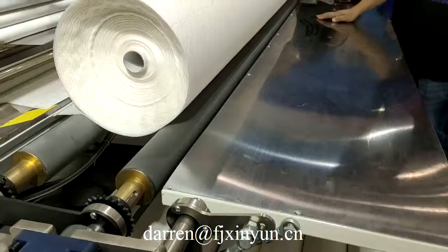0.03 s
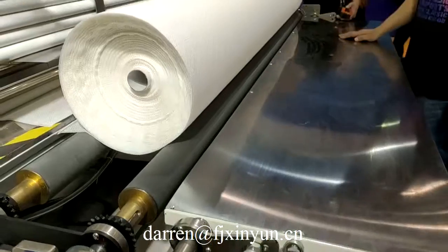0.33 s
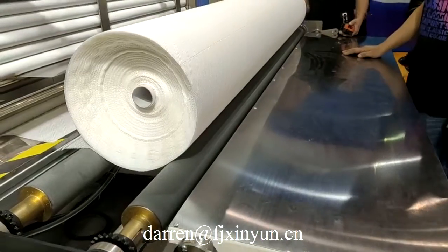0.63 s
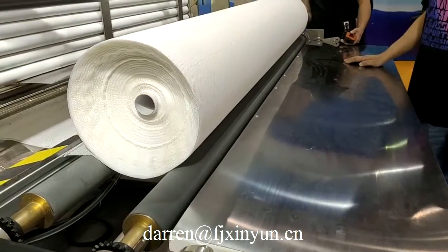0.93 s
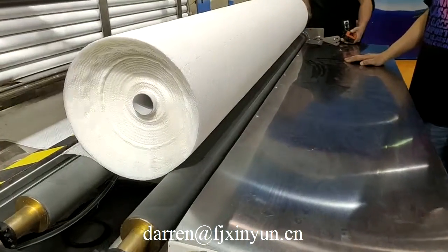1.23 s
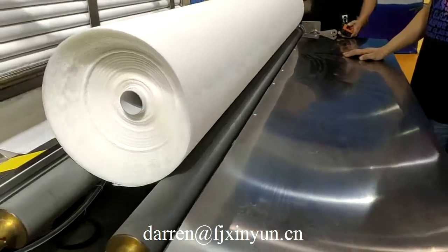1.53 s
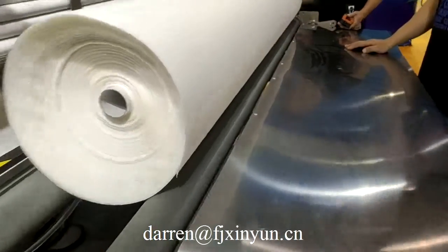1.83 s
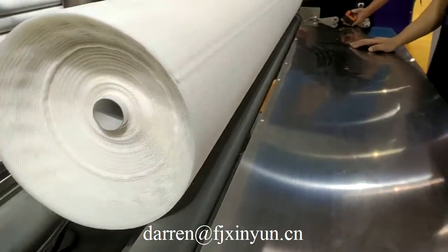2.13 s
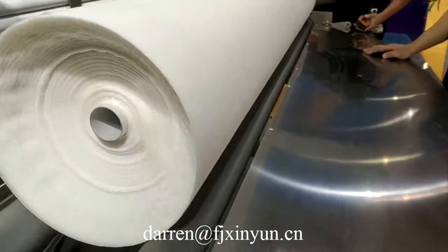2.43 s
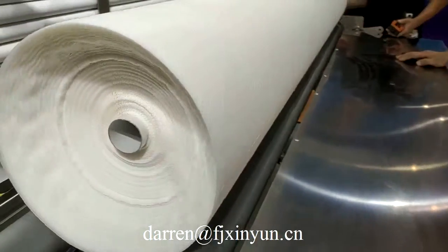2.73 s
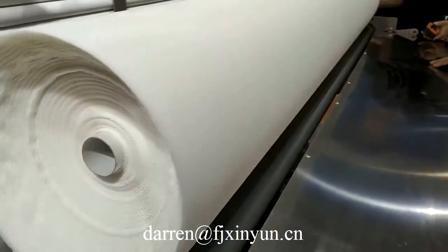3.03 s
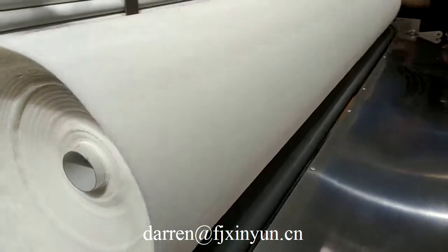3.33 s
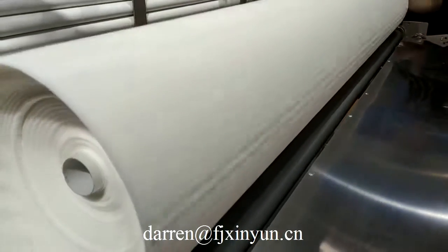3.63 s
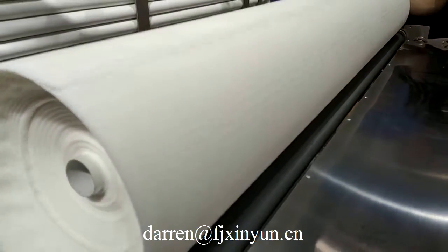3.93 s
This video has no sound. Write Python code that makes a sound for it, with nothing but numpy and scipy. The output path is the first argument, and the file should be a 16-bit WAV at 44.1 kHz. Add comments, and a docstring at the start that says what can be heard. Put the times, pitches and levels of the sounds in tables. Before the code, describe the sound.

A paper rewinding machine fades in at about 0.2 seconds and runs throughout with a pulsing rumble, roller roar, wavering hum and paper hiss on the left. Soft close swishes come between 0.8 and 1.5 seconds. At 2 seconds a loud handling rasp and two small clacks sound, then a sliding hiss peaks with more swishes around 2.6. The left side gradually dulls, turning sharply muffled at 3.4 seconds.

```python
"""A factory hall, where a paper rewinder spins a big roll: a rumble that repeats on every turn,
the roar of rollers, a wavering drive hum and the hiss of the paper web. A thin hiss sits to the right.
Close by come soft swishes, a sliding hiss, one loud rasp and two small clacks, like fingers shifting
on the recorder's case. The sound fades in and a limiter ducks after the rasp. The left treble dulls
gradually, then drops sharply near the end as the microphone is covered."""
import sys
import numpy as np
from scipy import signal
from scipy.io import wavfile
from scipy.ndimage import uniform_filter1d

SR = 44100
rng = np.random.default_rng(int(sys.argv[2]) if len(sys.argv) > 2 else 0)


def generate_wav(sig):
    """Save sig (samples, or channels by samples) to the path in sys.argv[1] as 16-bit PCM at SR."""
    pcm = np.round(np.clip(np.atleast_2d(sig).T, -1, 1) * 32767).astype(np.int16)
    wavfile.write(sys.argv[1], SR, pcm)


N = 176400
T = np.arange(N) / SR

# Stereo image of the hall. Each row: frequency in Hz, left-right correlation.
CORRELATION = [(50, 0.85), (140, 0.97), (300, 0.96), (480, 0.71), (700, 0.56), (900, 0.33), (1130, 0.11),
               (1500, -0.29), (2150, -0.027), (2800, 0.15), (3600, -.08), (6000, 0.38)]
# Fader rides for the top hiss, sliding hiss, paper web and roar. Each row: time in seconds, level in dB.
AIR_LEVEL = [(0.2, -56), (0.45, -49), (1.1, -57.5), (2.5, -46.5), (2.7, -76), (2.95, -90)]
SLIDE_LEVEL = [(0.5, -50), (1.0, -61), (1.6, -47), (1.9, -39.5), (2.1, -38.5), (2.25, -34), (2.38, -36.5),
               (2.53, -30), (2.59, -44), (2.75, -71)]
WEB_LEVEL = [(0.3, -47), (0.7, -38), (0.85, -38), (1.1, -37.5), (1.4, -35), (1.8, -36), (2.3, -36.5),
             (2.55, -36), (2.8, -37.5), (3.25, -40), (3.5, -46), (4, -42)]
ROAR_LEVEL = [(0.4, -27), (1.4, -27), (2.2, -28), (2.8, -27.5), (3.37, -26.5), (3.46, -27), (3.54, -26),
              (3.75, -26)]
# Tone of those four and of rubbing on the case. Each row: frequency in Hz, relative density in dB.
AIR_TONE = [(9500, -2), (12000, -43), (15000, 26)]
SLIDE_TONE = [(1500, 1.5), (2800, 6), (4000, 6.5), (5700, 7.5), (7300, 5.5), (9000, -1.5), (11500, -32),
              (15000, -34)]
WEB_TONE = [(900, 8.5), (2000, -2), (2700, -3), (3400, 4.5), (4200, 6.5), (5300, 8), (6500, -13),
            (8000, -76), (10500, -102), (15000, -51)]
ROAR_TONE = [(28, -29), (55, -19), (100, -14.5), (140, -7), (190, -2), (340, -1), (520, -4), (800, -5),
             (1300, -10), (2100, -17), (3700, -19.5), (4700, -25.5), (6000, -19), (7500, -35), (9500, -94),
             (12000, -108)]
RUB_TONE = [(300, -16), (680, 0.5), (1000, 0.5), (1400, 0), (2200, -3.5), (3300, -3), (4400, 2), (5700, -2),
            (7000, -6.5), (9000, -19), (12000, -32), (15000, -27)]
# Swish cues. Each row: peak time in seconds, level in dB, attack and decay in seconds,
# low and high band edge in Hz, pan to the left in dB.
SWISHES = [(0.808, -27.5, 0.031, 0.042, 3200, 6460, 5.5), (0.882, -34.5, 0.0052, 0.0085, 3520, 6500, 5),
           (0.963, -29.5, 0.013, 0.029, 3570, 6860, 3), (1.240, -29, 0.015, 0.023, 4360, 6550, 0.5),
           (1.308, -29, 0.0098, 0.056, 2900, 6950, 4), (1.547, -31.5, .008, 0.018, 3300, 7600, 5),
           (2.552, -21, 0.013, 0.016, 2870, 8300, 7), (2.633, -25.5, 0.0033, 0.0073, 6400, 7300, 12),
           (2.640, -26.5, 0.011, 0.03, 3280, 7650, 8), (2.805, -36, 0.01, 0.019, 4200, 6400, -13)]
# Rasp and clack cues. Each row: peak time in seconds, level in dB, attack and decay in seconds,
# rubbing against ring in dB, snap against one slip in dB, pan to the left in dB.
CLACKS = [(1.985, -14.5, 0.013, 0.011, 5, -6, 2.8), (2.001, -22.5, 0.0044, 0.0054, 1.5, -3, 0),
          (2.074, -24.5, 0.013, 0.012, -2, 9, 4.5), (2.105, -31, 0.0026, 0.0036, 0, 0, 0),
          (2.1174, -17.5, .002, 0.0065, -7, 8.5, 12)]
# The ring of the case. Each row: frequency in Hz, gain in dB, time to fall 60 dB in seconds.
CASE_MODES = [(2350, 0, 0.018), (2610, 1.5, 0.018), (2870, -4, 0.018), (3030, 14, 0.014),
              (3447, 5.5, 0.022), (4430, -9, .012), (4800, -16, .012), (5900, -15, .01), (7200, -7, 0.0094)]
# EQ for the knock of the case, the hollow of the hand and the left microphone.
# Each row: centre in Hz, width in Hz, gain in dB.
KNOCK_EQ = [(940, 220, 8)]
HAND_EQ = [(2740, 500, 3), (6950, 1600, 9.5)]
LEFT_MIC_EQ = [(1430, 770, 1), (2670, 620, 5), (6300, 1500, -5.5)]
# Tones of the drive. Each row: frequency in Hz, level in dB.
HUM_TONES = [(132, -51.5), (158, -48.5), (368.5, -42.5), (415, -49), (442, -49), (1846, -50.5)]
# Harmonics of the rumble. Each row: multiple of the turning rate, level in dB.
RUMBLE_HARMONICS = [(7, -67), (8, -67), (9, -58), (10, -48.5), (11, -45.5), (12, -43), (13, -46.5),
                    (14, -44), (15, -41), (16, -49), (17, -47), (18, -59), (19, -58.5), (20, -40),
                    (21, -69), (24, -50.5), (25, -44.5), (26, -42), (27, -61), (28, -43), (30, -52.5),
                    (31, -67), (32, -50), (33, -59), (34, -47.5), (36, -52), (39, -53), (41, -76),
                    (46, -67), (47, -46), (51, -61), (53, -65), (56, -51), (57, -54), (58, -76),
                    (59, -46.5), (60, -61), (61, -80), (65, -67), (66, -57), (67, -51.5)]
# Fader ride for the rumble, with a few surges. Each row: time in seconds, gain in dB.
RUMBLE_RIDE = [(0.4, -.5), (1.2, 0.4), (1.32, -1), (1.45, 0.5), (2.2, -0.22), (3.22, 0.3), (3.36, 1.5),
               (3.47, -1.44), (3.53, 4.5), (3.75, -1)]
# The left channel's treble dulls gradually, then drops sharply at 3.42 s as the microphone is covered.
# Each row: time in seconds, cut-off in Hz.
LEFT_CUTOFF = [(2.6, 12700), (2.9, 8400), (3.2, 7500), (3.40, 5350), (3.46, 3300), (3.62, 3850), (4, 2970)]
# The opening fade. Each row: seconds after the sound starts, gain in dB.
FADE_IN = [(0, -18), (.05, -8), (.12, -3), (.182, -1.5), (.198, 0.5), (.4, 0)]


def from_db(db):
    """Decibels to gain."""
    return 10 ** (np.asarray(db) / 20)


def rms_one(x):
    """Scale to rms 1."""
    return x / np.sqrt(np.mean(x ** 2) + 1e-20)


def in_time(rows, start=0):
    """An automation curve, read at every sample."""
    return np.interp(T - start, *np.transpose(rows))


def at_hz(points, hz):
    """Read a curve on a log-frequency axis."""
    freqs, values = np.transpose(points)
    return np.interp(np.log(hz), np.log(freqs), values)


def butter(x, hz, kind, order=2):
    """Butterworth filter."""
    sos = signal.butter(order, np.clip(hz, 10, .45 * SR), kind, fs=SR, output="sos")
    return signal.sosfilt(sos, x)


def bell_eq(x, bells):
    """A chain of bell boosts and cuts."""
    for hz, width, db in bells:
        w, g = 2 * np.pi * hz / SR, from_db(db / 2)
        a = np.sin(w) * width / (2 * hz)
        x = signal.lfilter([1 + a * g, -2 * np.cos(w), 1 - a * g],
                           [1 + a / g, -2 * np.cos(w), 1 - a / g], x)
    return x


def pan(left_db):
    """Constant-power gains, with the left louder by left_db."""
    return rms_one(from_db([[left_db / 2], [-left_db / 2]]))


def drift(hz):
    """Smooth random modulation with a spread of about 1."""
    step, settle = 40, 2000
    pole = np.exp(-2 * np.pi * hz * step / SR)
    white = rng.standard_normal(N // step + settle + 2)
    slow = signal.lfilter([1], [1, -2 * pole, pole * pole], white)[settle:]
    return np.interp(np.arange(N) / step, np.arange(len(slow)), rms_one(slow))


def stereo(mid, side, correlation):
    """Two unrelated signals become a pair with the given correlation."""
    return np.sqrt((1 + correlation) / 2) * mid + np.sqrt((1 - correlation) / 2) * side * [[1], [-1]]


def banded_noise(tone, flicker_db=.6):
    """Third-octave bands of stereo noise, each with its own level and flicker; rms 1."""
    out, edges = 0, 25 * 2 ** (np.arange(29) / 3)
    white = rng.standard_normal((2, 2, N))
    for k, (low, high) in enumerate(zip(edges, edges[1:])):
        hz = np.sqrt(low * high)
        if high > tone[0][0]:
            band = stereo(*butter(white[k % 2], [low, high], "band"), at_hz(CORRELATION, hz))
            out += band * from_db(at_hz(tone, hz) + flicker_db * drift(hz=11))
    return rms_one(out)


def swell(peak_s, attack, decay, hold=0):
    """Exponential rise, a hold and exponential fall."""
    return np.exp(-np.clip(np.maximum((peak_s - T) / attack, (T - peak_s - hold) / decay), 0, 20))


def air_hiss():
    """A thin hiss in the top octave, hard right."""
    return from_db(in_time(AIR_LEVEL)) * pan(left_db=-37) * banded_noise(AIR_TONE)


def sliding_hiss():
    """A bright friction hiss that is at its strongest after the rasp."""
    return from_db(in_time(SLIDE_LEVEL)) * pan(left_db=1.5) * banded_noise(SLIDE_TONE)


def swishes(top_hz=7470, grain_db=2.4, sheen_hz=10000, sheen_db=-22):
    """Short grainy strokes of friction noise, each with a faint top-octave sheen on the right."""
    noise = butter(rng.standard_normal((2, N)), top_hz, "low", order=4)
    grain = from_db(grain_db * drift(hz=120))
    treble = rms_one(butter(rng.standard_normal((2, N)), sheen_hz, "high"))
    sheen = from_db(sheen_db) * pan(left_db=-29) * treble
    out = 0
    for peak_s, db, attack, decay, low_hz, high_hz, pan_db in SWISHES:
        body = pan(pan_db) * rms_one(butter(noise, [low_hz, high_hz], "band"))
        out += from_db(db) * swell(peak_s, attack, decay, hold=0.0083) * (body + sheen) * grain
    return out


def case_ring(force):
    """The case answers a force with short decaying modes of alternating polarity."""
    out = 0
    for k, (hz, db, t60) in enumerate(CASE_MODES):
        r, w = from_db(-60 / (t60 * SR)), 2 * np.pi * hz / SR
        mode = signal.lfilter([0, np.sin(w)], [1, -2 * r * np.cos(w), r * r], force + 1e-18)
        out += (-1) ** k * from_db(db) * mode
    return out


def rasp_and_clacks(slips_per_s=3000, spread_db=2.5):
    """Bursts of tiny slips, each with a snap at its peak, ring the case; rubbing noise lies on top."""
    slips = (rng.random((2, N)) < slips_per_s / SR) * rng.choice([-1, 1], (2, N))
    slips = slips * from_db(spread_db * rng.standard_normal((2, N)))
    slips = stereo(*slips, correlation=0.5)
    rub = bell_eq(banded_noise(RUB_TONE), KNOCK_EQ)
    force, rub_gain = 0, 0
    for peak_s, db, attack, decay, rub_db, snap_db, pan_db in CLACKS:
        push = from_db(db) * pan(pan_db) * swell(peak_s, attack, decay)
        snap = from_db(snap_db) * (np.arange(N) == int(peak_s * SR))
        force += push * (slips + snap)
        rub_gain += push * from_db(rub_db)
    return case_ring(force) / np.std(case_ring(slips)) + rub_gain * rub


def paper_web():
    """The running paper hisses on the left."""
    return from_db(in_time(WEB_LEVEL)) * pan(left_db=16) * banded_noise(WEB_TONE)


def drive_hum(waver_hz=2.54):
    """The tones of the drive, each wavering in level and phase."""
    out = 0
    for hz, db in HUM_TONES:
        carrier = np.exp(2j * np.pi * hz * T)
        wavers = [drift(waver_hz) + 1j * drift(waver_hz) for _ in range(2)]
        mid, side = (rms_one(np.real(waver * carrier)) for waver in wavers)
        out += from_db(db) * stereo(mid, side, at_hz(CORRELATION, hz))
    return out


def roller_roar():
    """The rollers fill the hall with a broad, lightly flickering roar."""
    return from_db(in_time(ROAR_LEVEL)) * banded_noise(ROAR_TONE, flicker_db=1)


def roll_rumble(turns_per_s=13, waver_db=1):
    """The rollers spin under the roll: a comb of gently wavering harmonics of the turning rate."""
    out = 0
    for multiple, db in RUMBLE_HARMONICS:
        hz = multiple * turns_per_s
        mid, side = np.sqrt(2) * np.sin(2 * np.pi * (hz * T + rng.random((2, 1))))
        out += from_db(db + waver_db * drift(hz=1)) * stereo(mid, side, at_hz(CORRELATION, hz))
    return out * from_db(in_time(RUMBLE_RIDE))


def scene():
    """The rewinder and the close sounds; a hollow hand colours slide, rasp and clacks on the left."""
    left, right = sliding_hiss() + rasp_and_clacks()
    handling = np.array([bell_eq(left, HAND_EQ), right])
    rewinder = roller_roar() + drive_hum() + roll_rumble() + paper_web()
    return rewinder + air_hiss() + swishes() + handling


def dull_then_cover(x, cover_s=3.42, ramp_s=0.021, loss_db=-10.5, shelf_hz=910, block=256):
    """The treble dulls gradually; at cover_s the microphone is covered and all above the bass drops."""
    dull, state, cut_hz = np.zeros(N), np.zeros((2, 2)), in_time(LEFT_CUTOFF)
    for i in range(0, N, block):
        low_pass = signal.butter(3, cut_hz[i], fs=SR, output="sos")
        dull[i:i + block], state = signal.sosfilt(low_pass, x[i:i + block], zi=state)
    bass = butter(dull, shelf_hz, "low", order=1)
    closed = np.clip((T - cover_s) / ramp_s, 0, 1)
    return bass + (dull - bass) * from_db(loss_db * closed)


def limiter(x, threshold_db=-12, release_db_per_s=56, window_s=0.0048):
    """Gain ducks at once on loud sound and recovers at a steady rate."""
    power = uniform_filter1d(np.mean(x ** 2, axis=0), int(window_s * SR))
    over_db = np.maximum(10 * np.log10(np.abs(power) + 1e-12) - threshold_db, 0)
    release_db = release_db_per_s * T
    return x * from_db(release_db - np.maximum.accumulate(over_db + release_db))


def record(dry):
    """The output chain: EQ and dulling on the left, then limiter, fade-in and a steep top cut."""
    start_s, top_hz = 0.17, 15700
    left = dull_then_cover(bell_eq(dry[0], LEFT_MIC_EQ))
    limited = limiter(np.array([left, dry[1]]))
    fade = from_db(in_time(FADE_IN, start_s)) * (T > start_s)
    top_cut = signal.ellip(10, .2, 80, top_hz, fs=SR, output="sos")
    return signal.sosfilt(top_cut, limited * fade)


dry = scene()
out = record(dry)
generate_wav(out)
```